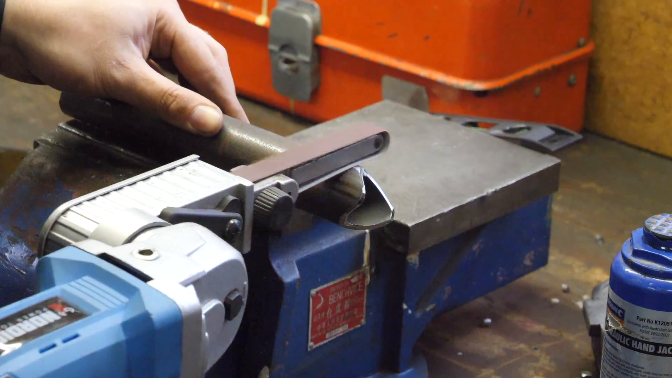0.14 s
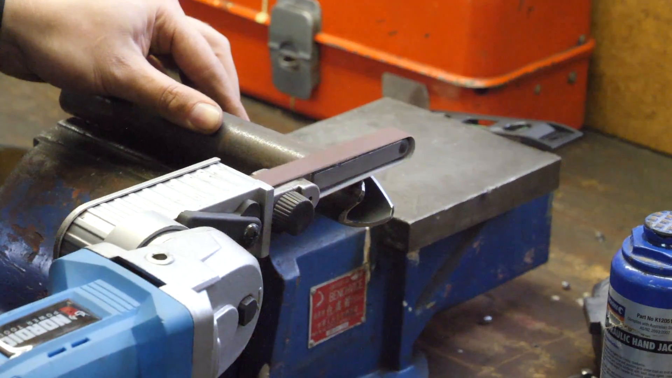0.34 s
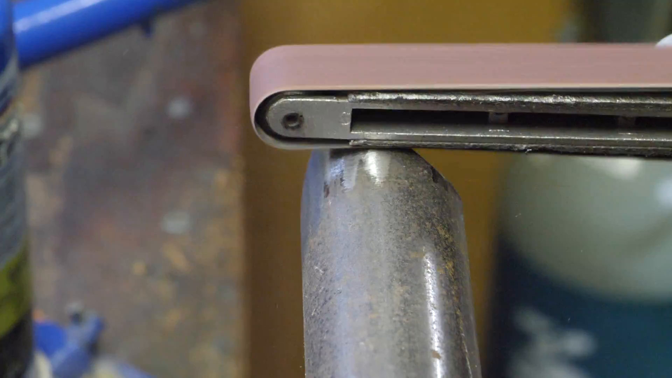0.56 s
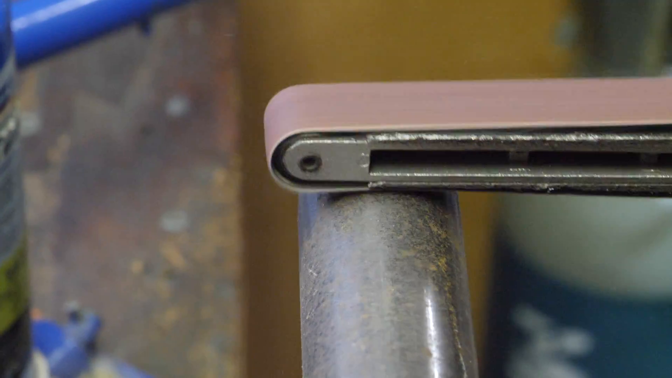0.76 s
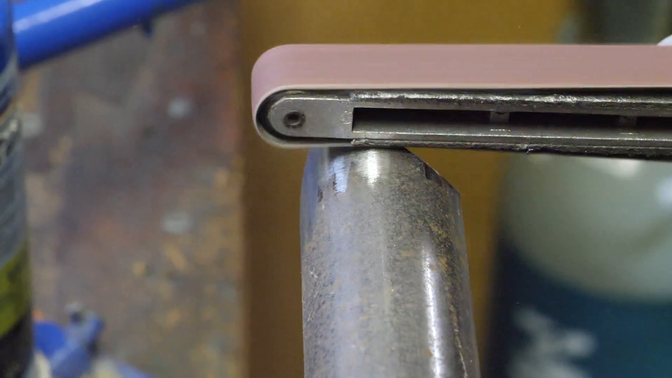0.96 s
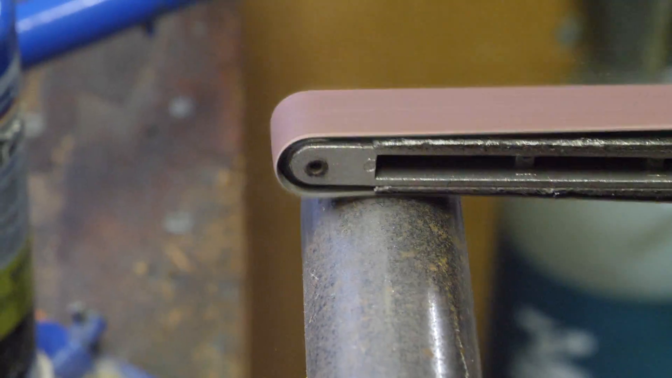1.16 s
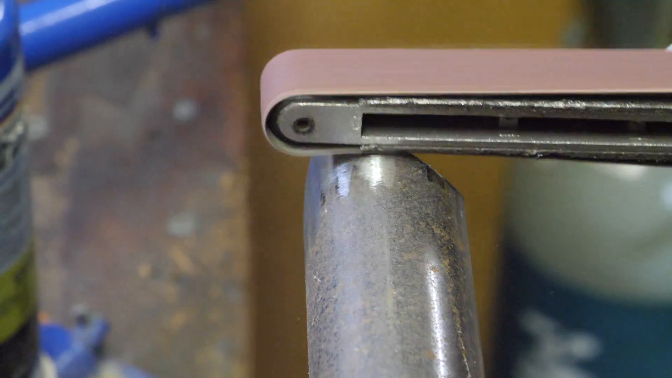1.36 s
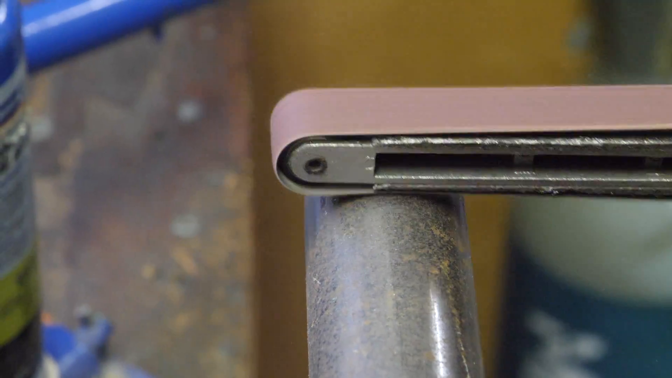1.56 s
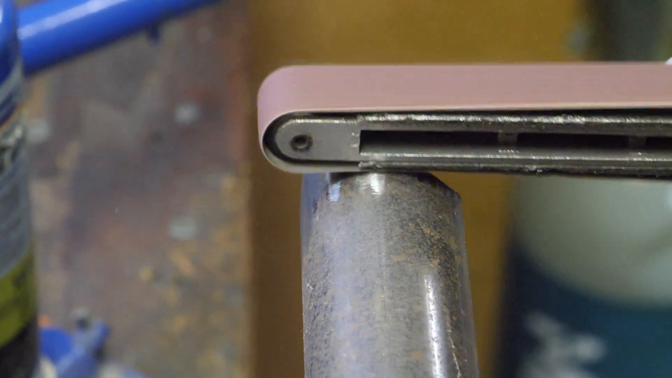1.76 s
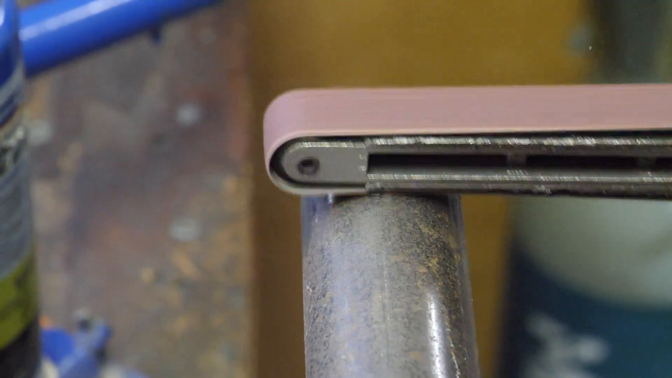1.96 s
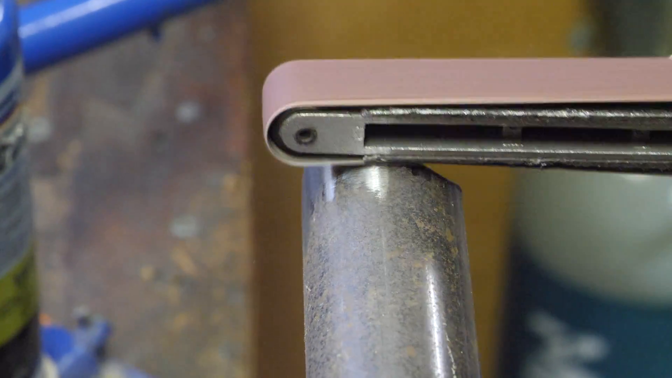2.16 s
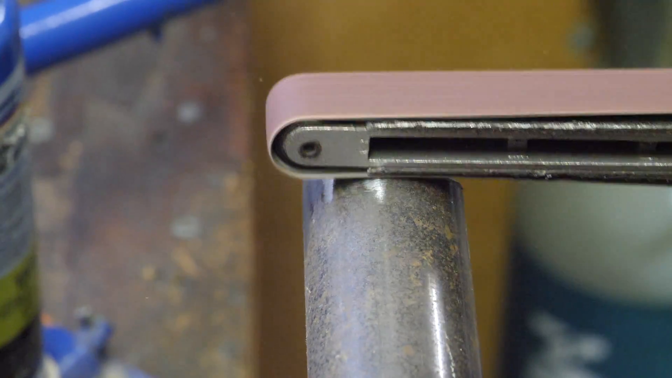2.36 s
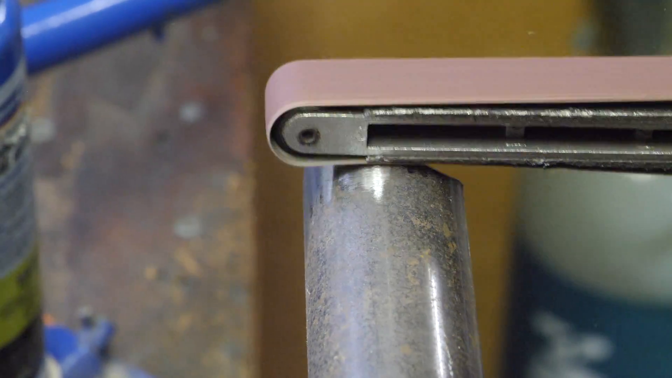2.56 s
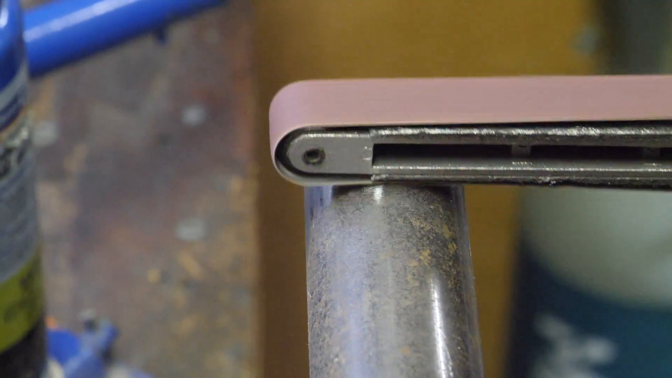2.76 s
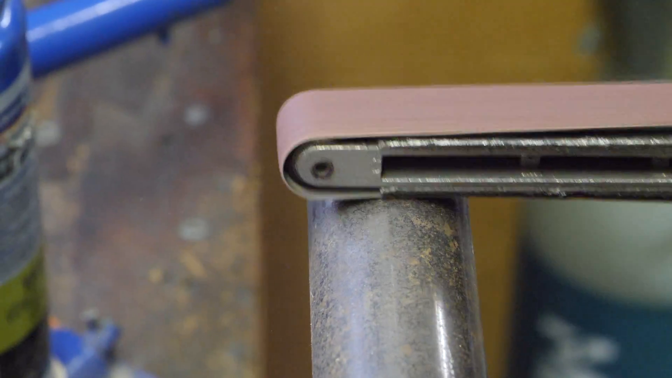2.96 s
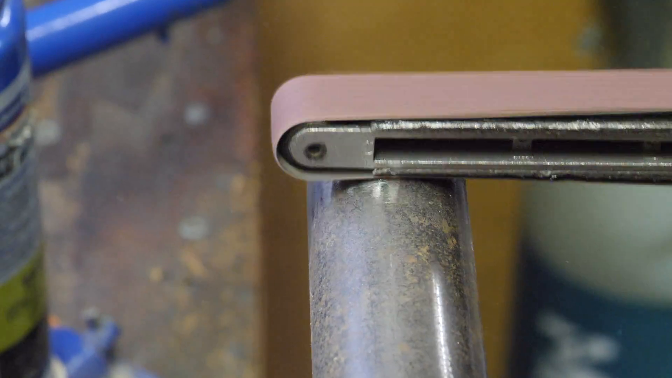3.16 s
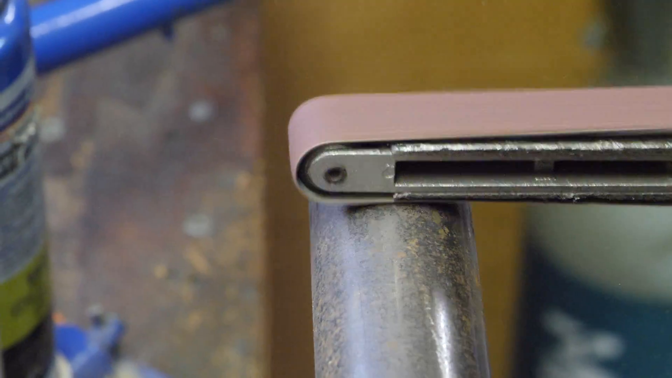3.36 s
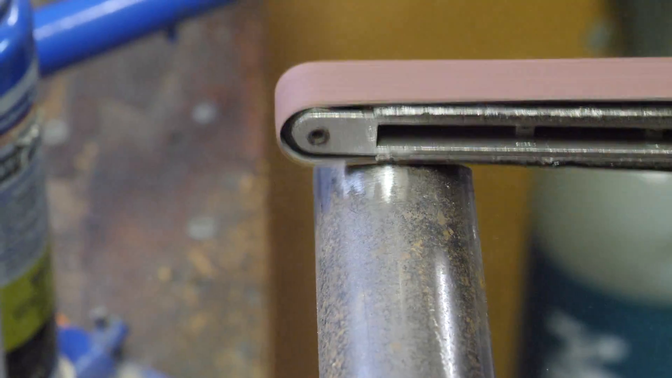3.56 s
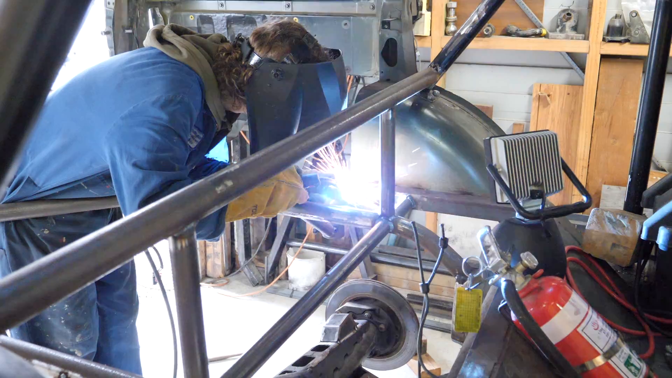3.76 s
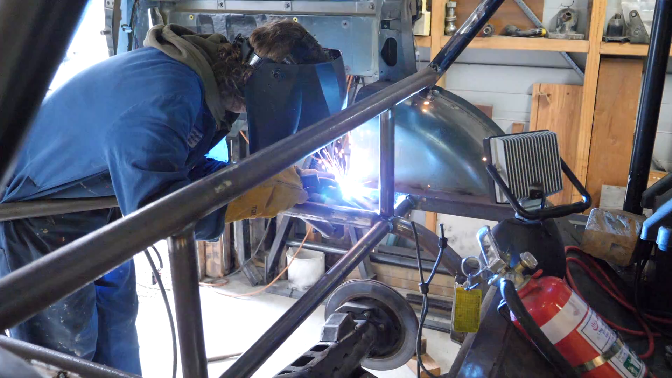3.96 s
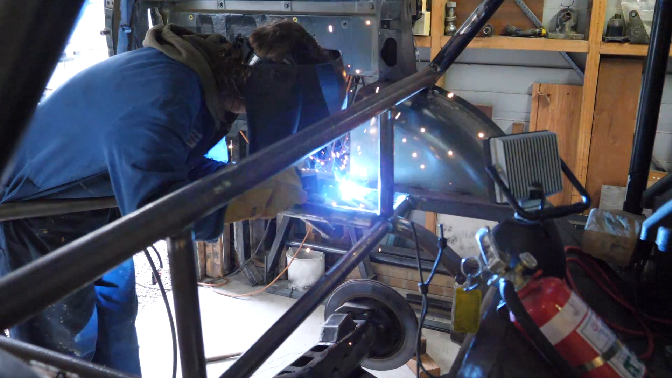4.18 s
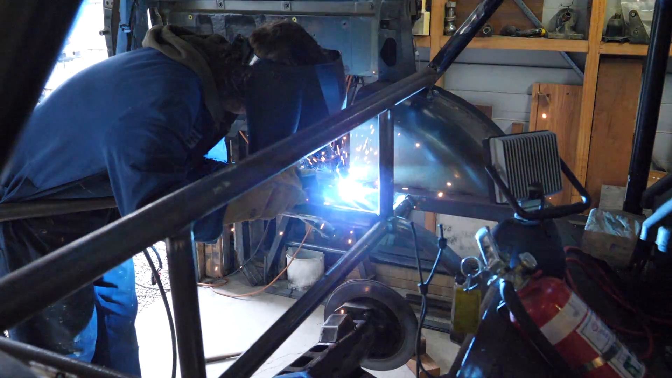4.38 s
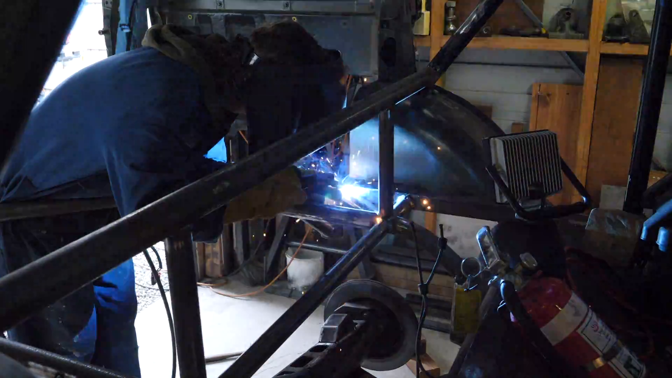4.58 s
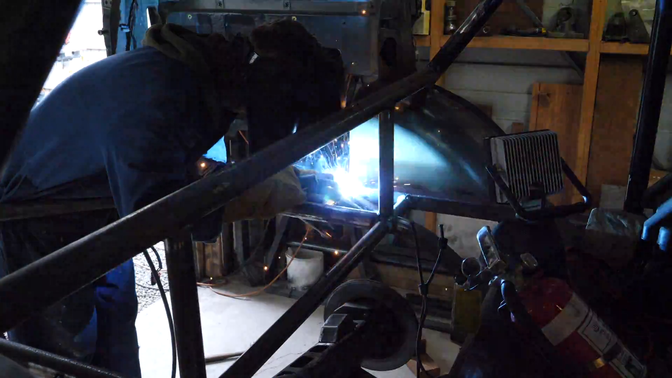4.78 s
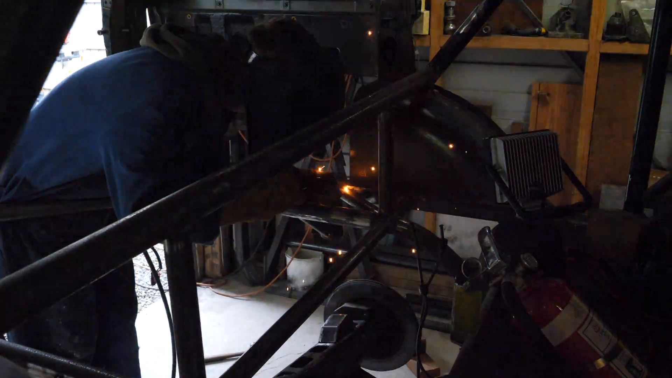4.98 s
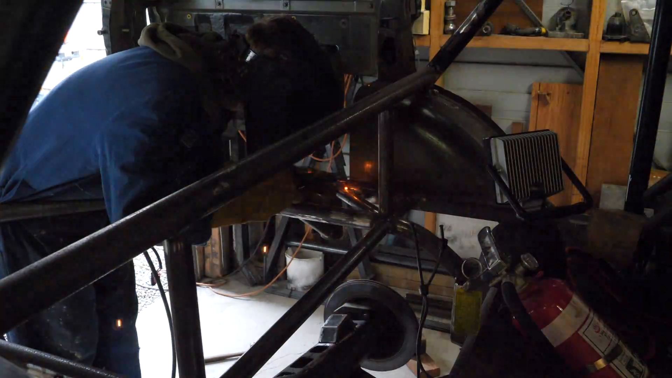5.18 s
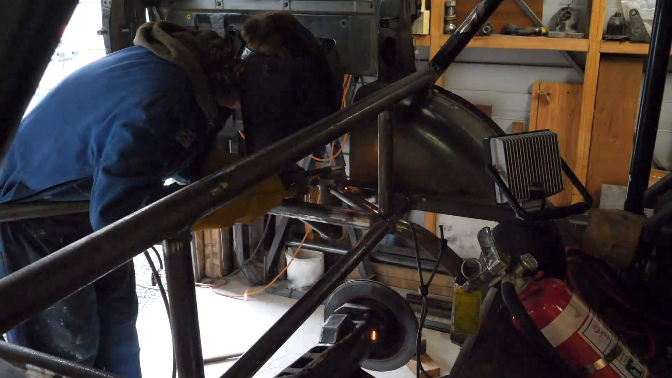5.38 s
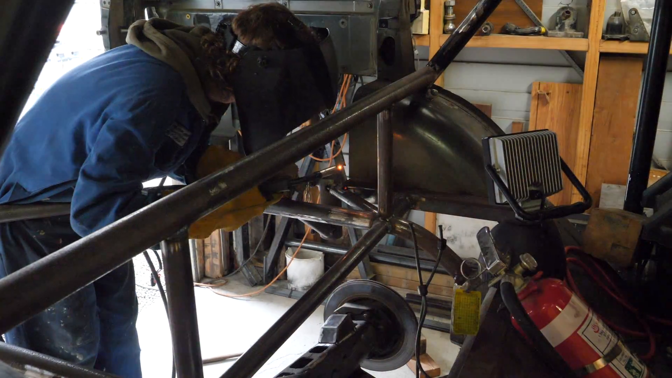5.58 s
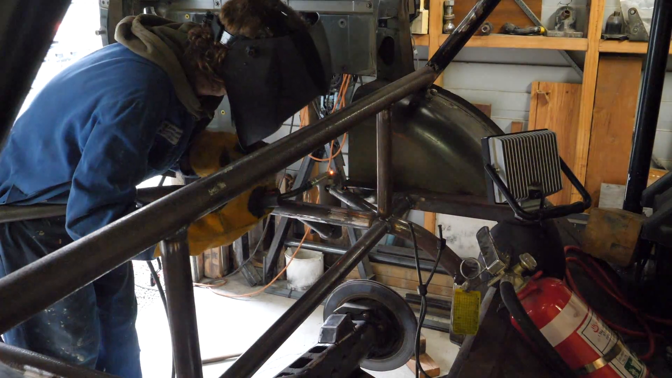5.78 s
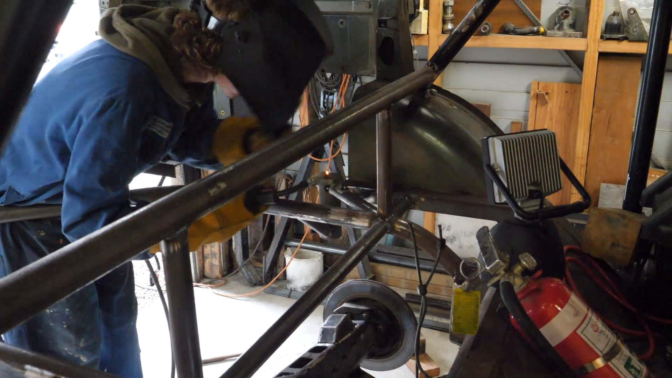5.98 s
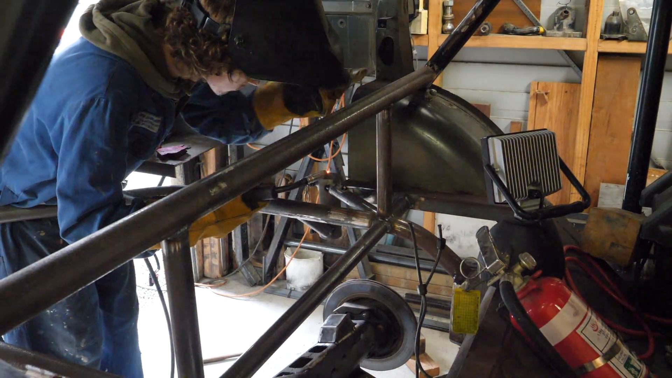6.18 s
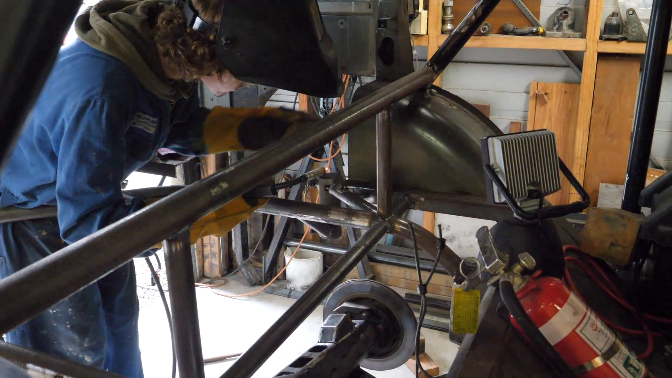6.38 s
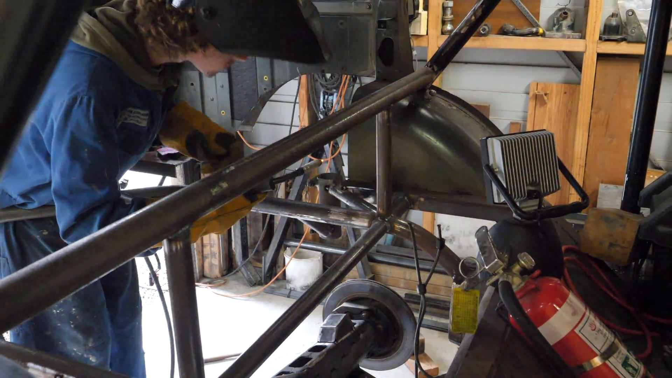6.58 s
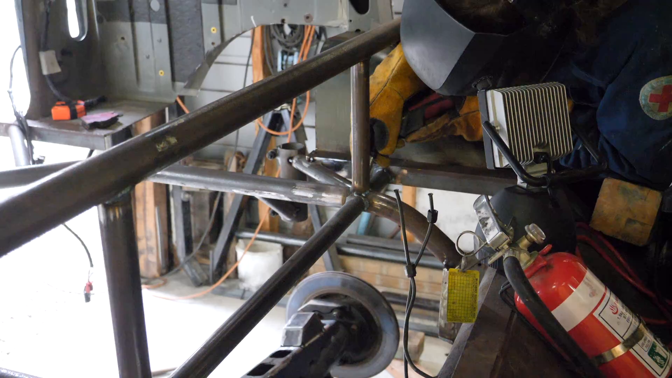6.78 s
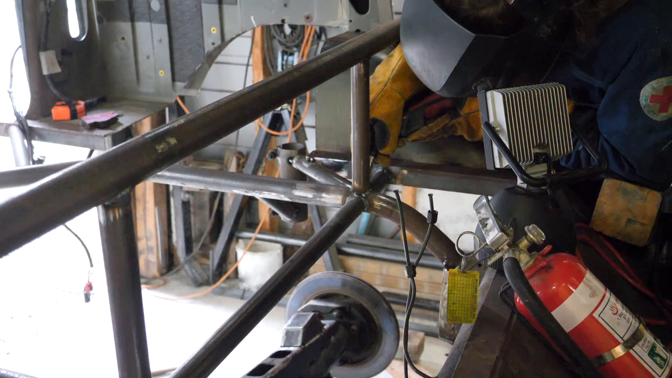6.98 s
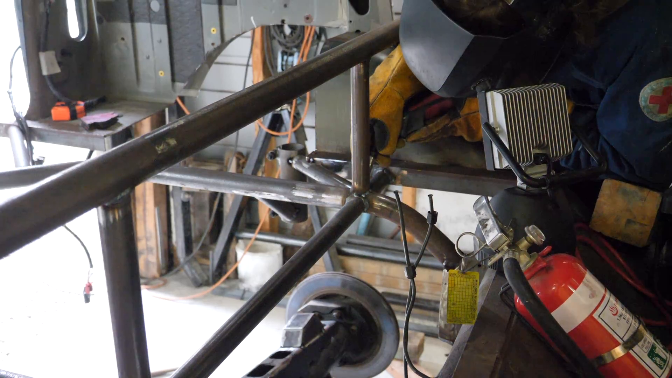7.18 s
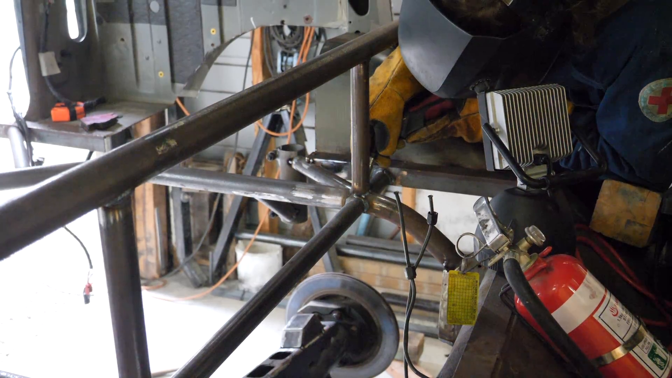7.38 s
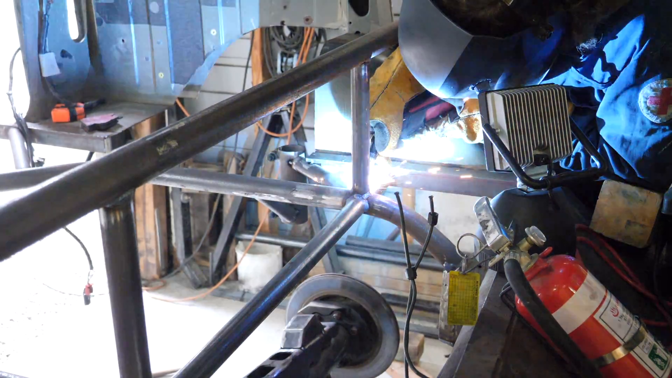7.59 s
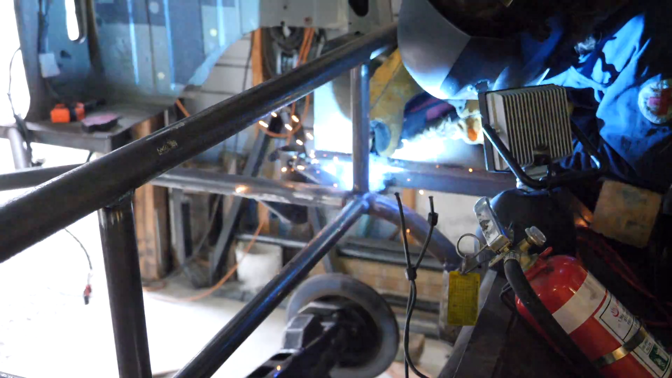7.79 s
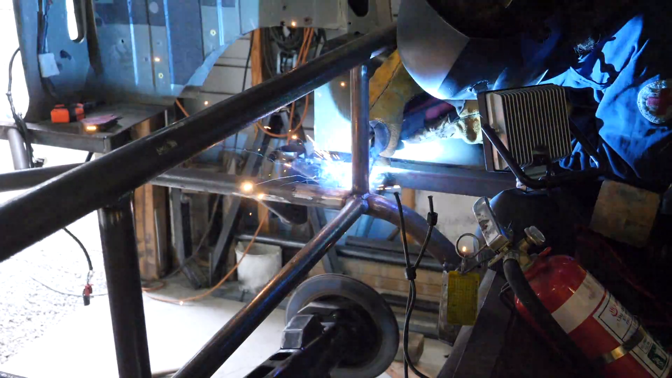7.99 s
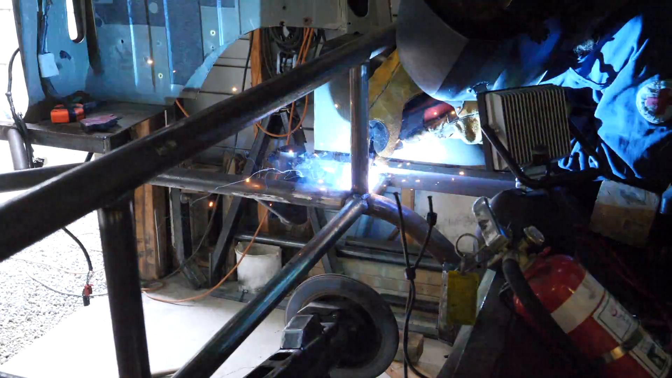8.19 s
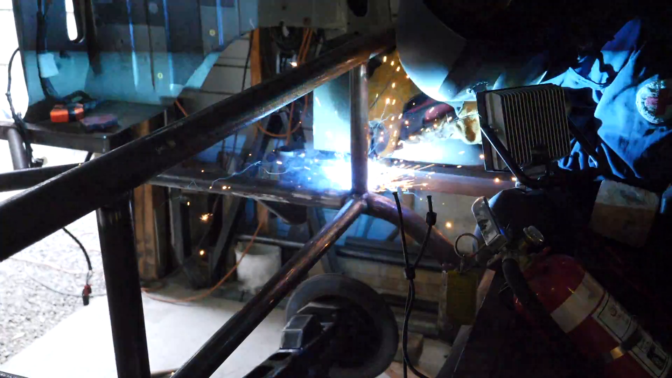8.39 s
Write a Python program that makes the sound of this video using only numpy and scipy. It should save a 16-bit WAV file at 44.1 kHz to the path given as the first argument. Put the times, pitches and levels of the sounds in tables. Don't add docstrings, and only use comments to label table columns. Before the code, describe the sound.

Close, bright power sanding opens: motor roar, high gear whine and quick strokes of abrasive rasp on steel. A hard cut leads to a far softer room drone, a puff of gas and rapid sharp welding snaps, heard a little way off inside a reverberant tube frame. Gas keeps hissing with a thin whistle, then torch knocks and near quiet, before another gas burst and a closer, irregular, slightly distorted crackle.

```python
import sys
import numpy as np
from scipy import signal
from scipy.fft import rfft, irfft, next_fast_len
from scipy.io import wavfile
from scipy.ndimage import uniform_filter1d, map_coordinates

SR = 44100
rng = np.random.default_rng(int(sys.argv[2]) if len(sys.argv) > 2 else 0)


def attenuation_scalar(level_db):
    decades = np.asarray(level_db, float) / 20
    return 10 ** decades


def unload_wav(signal):
    wavfile.write(
        sys.argv[1],
        SR,
        np.round(np.clip(np.atleast_2d(signal).T, -1, 1) * 32767).astype(np.int16),
    )


N = 372204
TIME = np.arange(N) / SR
CUTS = (.5, 3.7137)


def unit(x):
    return x / np.sqrt(np.mean(x ** 2) + 1e-20)


def along(points, hz):
    f, v = np.transpose(points)
    return np.interp(np.log(hz + 1), np.log(f + 1), v)


def curves(rows):
    s, *columns = np.transpose(rows)
    return [np.interp(TIME, s, column) for column in columns]


def wobble(rate):
    return map_coordinates(rng.standard_normal(int(N * rate / SR) + 4), [TIME * rate])


def filtered(x, response):
    m = next_fast_len(len(x) + 8192)
    return irfft(rfft(x, m) * response(np.fft.rfftfreq(m, 1 / SR)), m)[:len(x)]


def modes(table):
    def response(f):
        total = 0
        for k, (centre, width, db) in enumerate(table):
            resonance = 1j * f * width / (centre * centre - f * f + 1j * f * width)
            total = total + (-1) ** k * attenuation_scalar(db) * resonance
        return total
    return response


def dipped(x, dips):
    def response(f):
        gain = 1
        for hz, width, depth in dips:
            gain = gain * (1 - np.minimum(depth, 1) * modes([(hz, width, 0)])(f))
        return gain
    return filtered(x, response)


def rush(spectrum, grain_db=0, ripple_db=0):
    grains = rng.standard_normal(N) * attenuation_scalar(grain_db * np.minimum(rng.exponential(size=N), 4))
    ripple = rng.standard_normal(500)

    def response(hz):
        return attenuation_scalar(along(spectrum, hz) + ripple_db * np.interp(hz, np.arange(500) * 45., ripple))
    return unit(filtered(grains, response))


def tones(lines, speed, sway_db, blur, blur_hz):
    turns = np.cumsum(speed) / SR
    count = int(N / SR * 32) + 2

    def drift(slow=1):
        knots_s = np.arange(count) * slow / 32
        return np.interp(TIME[:len(speed)], knots_s, rng.standard_normal(count))

    heard = np.zeros(len(speed))
    for hz, db in lines:
        unsteady = np.sqrt(hz / blur_hz)
        level = np.sqrt(2) * attenuation_scalar(db + sway_db * unsteady * drift(slow=3.1))
        heard += level * np.sin(2 * np.pi * hz * turns + blur * unsteady * drift())
    return np.pad(heard, (0, N - len(speed)))


def belt_file():
    # time_s, turns_per_s
    motor_speed = [(0, 267.5), (.48, 267.5), (.6, 265.9), (1.1, 265.2), (2.1, 265.3), (2.6, 264.8),
                   (3.6, 265.7)]
    # centre_hz, width_hz, level_db
    arm_modes = [(751, 63, -3), (900, 104, 4), (960, 248, 0)]
    # pitch_hz, level_db (rms)
    wide_tones = [(267.6, -62.5), (683.7, -33), (877.5, -37), (2116, -42), (2681, -37), (3284, -42),
                  (3483, -25), (3747, -36), (4124, -39), (4883, -40)]
    # pitch_hz, level_db (rms)
    close_tones = [(265.2, -54), (678.3, -35.5), (872.1, -31.5), (1061, -39.5), (1357, -41), (1591, -41),
                   (1744, -40), (2299, -50.5), (2652, -33), (2917, -46), (3158, -34.5), (3182, -28.5),
                   (3340, -46), (3444, -35), (3713, -28.5), (4774, -40.5), (4915, -43), (5792, -51),
                   (7149, -41.5), (7946, -55)]
    shaft_hz = curves(motor_speed)[0]
    beat = 1 + 0.24 * np.sin(2 * np.pi * np.cumsum(shaft_hz) / SR)
    wide = np.clip((CUTS[0] - TIME) / .004, 0, 1)
    arm = attenuation_scalar(-28.5) * unit(filtered(rng.standard_normal(N), modes(arm_modes)))
    whine_wide = tones(wide_tones, shaft_hz[TIME < CUTS[0]] / wide_tones[0][0],
                       sway_db=1.5, blur=0.28, blur_hz=3000)
    whine_close = tones(close_tones, shaft_hz[TIME < CUTS[1]] / close_tones[0][0],
                        sway_db=2.0, blur=0.7, blur_hz=3000)
    noise = beat * (motor_roar(wide) + grit_rasp())
    whine = wide * whine_wide + (1 - wide) * (arm + whine_close)
    return (noise + whine) * np.clip((CUTS[1] - TIME) * 500, 0, 1)


def motor_roar(wide):
    # freq_hz, level_db_per_hz
    rumble = [(20, -35), (100, -33.5), (250, -31.5), (420, -32)]
    # freq_hz, level_db_per_hz
    roar_wide = [(280, -53), (480, -20), (633, -9.5), (671, -7.5), (754, -6.5), (1270, -9.5), (2090, -7),
                 (2330, -13), (2670, -3), (2960, -4), (3470, -0.5), (4320, -5.5), (5620, -5), (8440, -22),
                 (15600, -33)]
    # freq_hz, level_db_per_hz
    roar_seen_close = [(510, -11.5), (600, -19), (720, -14), (950, -7),
                       (1100, -6.5), (1270, -13), (1400, -8.5), (2050, -6), (2600, -2.5), (3300, -1), (3830, -4),
                  (4200, -5), (4550, -5), (4900, -3.5), (5900, -6), (6250, -10.5), (7100, -7), (7650, -16),
                       (9000, -16.5), (11000, -20), (13500, -27.5), (15700, -27)]
    far = attenuation_scalar(0.04) * rush(rumble + roar_wide[1:], grain_db=5.0, ripple_db=3.0)
    near = attenuation_scalar(-0.38) * rush(rumble + roar_seen_close, grain_db=3.0, ripple_db=1.5)
    return attenuation_scalar(-17.5 + 0.55 * wobble(8.19)) * (wide * far + (1 - wide) * near)


def grit_rasp():
    # freq_hz, level_db_per_hz
    grit = [(3000, -36), (6000, -4), (7500, -2), (8000, 5), (8500, -3.5), (10000, -4), (11000, -1.5),
            (14000, -4.5), (15700, -6)]
    return attenuation_scalar(pressure_db() - 1.5 + 1.2 * wobble(40)) * rush(grit, grain_db=2.5, ripple_db=2.5)


def pressure_db():
    # middle_s, rasp_db, hold_s
    presses = [(0.364, -20.5, .04), (0.644, -25.5, 0.072), (1.012, -23.5, .04), (1.4, -22.5, 0.032),
               (1.75, -24, .02), (2.16, -23, 0.079), (2.52, -22.5, .07), (2.9, -26, .04),
               (3.03, -27.5, 0.044), (3.28, -27.5, 0.0594), (3.69, -25.5, 0.073)]
    press_db_per_s, lift_db_per_s, resting_db = 117, 200.5, -30
    strokes = []
    for s, db, hold in presses:
        until_hold = np.clip(s - hold / 2 - TIME, 0, 9)
        since_hold = np.clip(TIME - s - hold / 2, 0, 9)
        strokes.append(db - press_db_per_s * until_hold - lift_db_per_s * since_hold)
    return np.maximum(np.max(strokes, axis=0), resting_db)


def arc(sparks, shock, snap, echoes, hall, snap_db, burst, echo_hz, echo_width_hz, early_db, late_db):
    treble_hz, shift = 6000, 0.42
    body_grows = 1.1
    t = np.arange(SR // 2) / SR
    ring = filtered(1. * (t == 0), lambda f: modes(snap)(f) + modes([shock])(f))
    direct = -ring / (1 + (t / burst) ** 6)

    paths = np.zeros(len(t))
    for k, (s, db) in enumerate(echoes):
        paths[round(s * SR)] = (-1) ** k * attenuation_scalar(db)
    bounced = signal.fftconvolve(paths, direct)[:len(t)]
    bounced = filtered(bounced, lambda f: modes([(echo_hz, echo_width_hz, 0)])(f) ** 2)

    diffuse = diffuse_field(t, hall, early_db)
    crack = attenuation_scalar(snap_db) / abs(direct).max()
    boom = attenuation_scalar(late_db) / diffuse[:, :1500].std()
    body = crack * bounced + boom * diffuse[0] * np.sqrt(1 - shift ** 2)
    treble = filtered(crack * direct + body, lambda f: (1j * f / (treble_hz + 1j * f)) ** 2)

    s, db, treble_db = np.transpose(sparks)
    turn = 2 * np.pi * rng.random(len(s))
    start = round(s.min() * SR)
    at = np.round(s * SR).astype(int) - start
    train = np.zeros((5, at.max() + 1))
    room = attenuation_scalar(body_grows * db)
    train[:, at] = [attenuation_scalar(db), room, attenuation_scalar(db) * (attenuation_scalar(treble_db) - 1),
                    shift * room * np.cos(turn), shift * room * np.sin(turn)]
    answers = [crack * direct, body, treble, *(boom * diffuse[1:])]
    heard = signal.fftconvolve(train, answers, axes=1).sum(0)
    return np.pad(heard, (start, N))[:N]


def diffuse_field(t, hall, early_db):
    # freq_hz, t60_s
    shop_decay = [(300, 0.13), (1000, 0.14), (3000, 0.19), (9000, 0.18), (15000, 0.064)]
    hz, frames, z = signal.stft(rng.standard_normal((3, len(t))), SR, nperseg=256)
    decay = attenuation_scalar(-60 * frames / along(shop_decay, hz)[:, None])
    late = signal.istft(z * decay, SR, nperseg=256)[1][:, :len(t)]
    early = rng.standard_normal(late.shape) * attenuation_scalar(-60 * t / 0.047)
    spectrum = rfft(attenuation_scalar(early_db) * early + late / late[:, :800].std())
    even = np.sqrt(uniform_filter1d(abs(spectrum) ** 2, size=60))
    colour = attenuation_scalar(along([(24, -70.0)] + hall[1:], np.fft.rfftfreq(len(t), 1 / SR)))
    build_s = .0012
    return irfft(spectrum / even * colour, len(t)) * (1 - np.exp(-t / build_s)) * (t < .45)


def first_weld():
    # start_s, level_db, treble_db
    touches = [(3.8071, -14.5, 8), (3.8093, -30, 1.5)]
    # start_s, level_db, treble_db
    stutter = [(3.8239, -3.5, 4.0), (3.8388, -11.0, 1.0), (3.8506, -9.5, 3.5), (3.8721, -8.5, 6.0),
               (3.8841, -5.5, 3.5), (3.8974, -3.0, 1.5), (3.9097, -1.5, 0.0), (3.9277, -3.5, 0.0),
               (3.9315, -11.5, 3.0)]
    # start_s, level_db, treble_db
    shorts = [(3.9824, 1.0, -1.0), (4.0013, -3.5, 0.5), (4.0137, -3.5, -2.0), (4.0303, -3.5, 1.0),
              (4.0498, 0.0, -0.5), (4.0575, -5.0, 2.5), (4.0656, -5.0, -1.0), (4.0762, 1.0, -1.5),
              (4.0941, 0.0, -1.5), (4.1118, 2.0, -3.5), (4.1343, 0.0, -1.5), (4.1514, 1.0, -2.5),
              (4.1799, 0.5, -2.5), (4.2043, 0.5, -2.5), (4.2357, 0.0, -1.0), (4.2652, -1.0, 1.0),
              (4.28, -3.0, 0.5), (4.2949, -1.5, -0.5), (4.3103, -3.0, 2.0), (4.3261, -2.5, 1.0),
              (4.3417, -1.0, 0.5), (4.3572, -5.5, 0.0), (4.3739, -5.5, 2.5), (4.3912, -4.0, 0.5),
              (4.4079, -4.0, 1.0), (4.424, -3.5, 0.5), (4.4304, 0.0, 0.0), (4.4418, -5.0, -0.5),
              (4.4549, -5.5, 1.0), (4.4726, -2.5, 0.5), (4.5015, -2.5, 1.5), (4.5219, -2.0, -1.0),
              (4.5414, -4.0, 2.0), (4.5474, -5.5, 2.5), (4.5642, -1.5, 0.0), (4.5712, -4.0, 1.5),
              (4.5796, -3.0, -1.0), (4.5892, -5.0, 0.5), (4.5976, -0.5, -1.5), (4.6066, -3.0, 0.5),
              (4.6239, -1.0, -0.5), (4.6443, -2.0, -2.0), (4.6643, 2.5, -4.0), (4.686, 2.5, -4.5),
              (4.705, 0.0, -1.5), (4.7244, -2.5, -0.5), (4.7346, -0.5, -0.5), (4.7478, -3.5, 1.0),
              (4.7993, 1.0, -3.0), (4.8185, -2.0, -2.0), (4.8352, -4.0, -1.0), (4.8529, -2.0, -1.0),
              (4.8727, -1.0, -2.0)]
    # centre_hz, width_hz, level_db
    plates = [(900, 1050, -3), (3300, 490, 1.5), (4410, 240, 3.5), (5170, 615, 0), (7930, 600, -4),
              (10900, 760, 3), (11800, 800, 2), (13400, 1400, -3.5)]
    # delay_s, level_db
    surfaces = [(.0006, -4.5), (.0012, -8), (.0021, -4), (.0036, -9), (.0045, -5), (.0063, -10),
                (.0078, -4.5), (0.0105, -14)]
    # freq_hz, level_db_per_hz
    hall = [(150, -52), (250, -27), (563, -3), (670, 0.5), (1010, -12), (1180, -5.5), (1820, -4),
            (2060, -7), (2490, -8), (3460, -1.5), (3770, -4.5), (5060, -4.5), (7030, -8), (11800, -7.5),
            (15600, -12.5)]
    shock = (9000, 9000, -15)
    return arc(touches + stutter + shorts, shock, plates, surfaces, hall, snap_db=4, burst=0.0021,
               echo_hz=4914, echo_width_hz=5900, early_db=8, late_db=-16.5)


def second_weld():
    # start_s, level_db, treble_db
    strikes = [(7.5469, -18, 2.5), (7.5536, -9, 3.5), (8.0471, -20, 6), (8.1025, -24, 1),
               (8.2513, -15.5, 0.5)]
    # start_s, level_db, treble_db
    settling = [(7.5562, -5.0, 1.5), (7.5601, -4.0, 2.5), (7.5672, -5.5, 2.5), (7.5789, -6.5, 0.0),
                (7.5882, 0.0, 0.5), (7.5971, -1.5, -2.0), (7.6073, 0.0, -5.5), (7.6159, -5.5, -8.0),
                (7.6257, -2.0, -4.5), (7.6419, -4.5, 3.0), (7.6582, -1.5, 1.5), (7.698, 3.0, -1.0),
                (7.7278, -2.0, 3.0), (7.7539, -1.5, 1.5), (7.7606, -2.5, -4.0), (7.7835, -2.0, 2.5),
                (7.791, -6.5, -3.0), (7.8055, -4.0, 2.0), (7.8168, -3.0, 1.5), (7.8753, -3.5, 1.5),
                (7.9031, -5.0, 2.0), (7.9194, -4.0, 3.0), (7.9361, 0.5, 0.0)]
    # start_s, level_db, treble_db
    shorts = [(7.9528, -3.5, 1.5), (7.9888, 2.5, -2.0), (8.0223, -2.0, 2.5), (8.0493, -3.0, 1.5),
              (8.0696, 2.0, -0.5), (8.1089, -2.0, 1.0), (8.1525, 0.0, -2.0), (8.169, -5.5, 1.0),
              (8.1836, -4.0, -1.5), (8.189, -6.0, 1.0), (8.1957, -5.0, -3.5), (8.2182, -2.5, 0.0),
              (8.2346, -1.0, 0.0), (8.264, -4.5, 3.0), (8.279, -2.5, -2.0), (8.2854, 0.0, -4.0),
              (8.3016, -2.5, -0.5), (8.3088, -3.5, -0.5), (8.3251, -0.5, -2.5), (8.3415, 0.5, -2.0),
              (8.3497, -2.0, -1.0), (8.3596, 0.5, 0.0), (8.3682, -1.0, -2.0), (8.4011, 0.5, -0.5),
              (8.4094, 0.5, -7.0), (8.4178, -5.5, 0.0), (8.4351, -6.5, 4.5)]
    # centre_hz, width_hz, level_db
    plates = [(1263, 900, -13), (3500, 600, -4), (4980, 350, 6), (6000, 600, -13.5), (7200, 900, -13),
              (9300, 600, -14), (11900, 1200, -13), (15000, 1200, -28)]
    # delay_s, level_db
    surfaces = [(.0008, -8), (.0036, -15), (.005, -3), (.0069, -11), (.0139, -15)]
    # freq_hz, level_db_per_hz
    hall = [(150, -51), (250, -17), (372, -23.5), (482, -4.5), (838, -16.5), (946, -2), (1090, -13.5),
            (1510, -9.5), (2490, -10.5), (3460, -6), (4110, -13.5), (4970, -2), (8500, -13), (11800, -12),
            (15600, -17)]
    shock = (4600, 5000, -15)
    return arc(strikes + settling + shorts, shock, plates, surfaces, hall, snap_db=5.5, burst=.0014,
               echo_hz=3400, echo_width_hz=2200, early_db=3.5, late_db=-16.5)


def sizzle():
    # start_s, end_s, level_db
    burns = [
        (3.807, 4.914, -26),
        (7.545, 8.442, -30),
    ]
    # freq_hz, level_db_per_hz
    fry = [(20, -70), (300, -20), (700, -3), (2500, -7.5), (5000, -3.5), (8000, -8.5), (12000, -1.5),
           (15600, -3)]
    t60_s = .2
    alight = np.zeros(N)
    for start, end, db in burns:
        alight += attenuation_scalar(db - 60 * np.clip(TIME - end, 0, 9) / t60_s) * (TIME > start)
    return alight * attenuation_scalar(1.6 * wobble(30)) * rush(fry, grain_db=1.5)


def gas():
    # time_s, level_db
    flows = [
        [(3.743, -49), (3.77, -48), (4.9, -52), (5.3, -52.5), (5.7, -54.5), (6.045, -52), (6.062, -62),
         (6.1, -68)],
        [(7.513, -48), (7.53, -51), (8.44, -51)],
    ]
    # freq_hz, level_db_per_hz
    nozzle = [(2350, -35), (4000, -12), (4610, -9), (5080, -5), (5560, -3.5), (7270, -15), (7960, -15.5),
              (8810, -16.5), (9540, -11.5), (10300, -22), (11300, -16.5), (12000, -25), (13700, -20.5),
              (15600, -32)]
    # time_s, delay_s
    torch = [(3.7, 0.00054), (5.0, 0.00021), (5.2, 0.00046), (5.35, 0.00098), (5.55, 0.0011), (5.7, 0.0012),
             (6.08, 0.0014), (7.5, 0.00035)]
    # start_s, level_db
    openings = [
        (3.743, -43.5),
        (7.513, -40),
    ]
    # freq_hz, level_db_per_hz
    valve = [(880, -17), (1500, 2.5), (1750, -18.5), (2450, 3), (2980, -12), (3410, -2), (3990, -14.5),
             (5570, -14), (8080, -17), (10400, -11), (11600, -15.5), (13000, -4.5), (15600, -18.5)]
    flow = np.zeros(N)
    for rows in flows:
        flow += attenuation_scalar(curves(rows)[0]) * (TIME > rows[0][0]) * (TIME < rows[-1][0])
    jet = rush(nozzle)
    lag = curves(torch)[0] * (1 + 0.15 * wobble(11))
    work_echo = 0.4 * map_coordinates(jet, [(TIME - lag) * SR])
    hiss = unit(jet + work_echo) * attenuation_scalar(1.4 * wobble(8.7))
    surge = sum(attenuation_scalar(db - 60 * np.abs(TIME - s) / 1.1) * (TIME > s) for s, db in openings)
    return flow * hiss + surge * rush(valve)


def whistle():
    # time_s, pitch_hz, level_db
    glide = [(4.95, 5500, -58), (5.17, 5850, -54.5), (5.3, 5100, -55), (5.33, 5600, -56.5),
             (5.55, 5300, -55.5), (5.66, 5600, -55.5), (5.8, 5400, -58), (5.9, 5200, -57),
             (6.05, 5250, -55.5)]
    pitch_hz, level_db = curves(glide)
    flutter = filtered(rng.standard_normal(N), lambda f: 1 / (1 + (f / 250) ** 4))
    band = unit(flutter * np.sin(2 * np.pi * np.cumsum(pitch_hz) / SR))
    return attenuation_scalar(level_db) * (TIME > glide[0][0]) * (TIME < glide[-1][0]) * band


def handling():
    # start_s, level_db, centre_hz, width_hz,
    # t60_s
    knocks = [(5.95, -40, 1480, 300, .035), (5.952, -43, 943, 300, .06), (5.951, -48, 2500, 2000, .06),
              (6.03, -44, 700, 300, .15), (5.968, -41, 776, 450, .12), (6.08, -72, 10900, 9000, .7),
              (6.28, -76, 12000, 6000, .08), (7.5135, -42, 2580, 1200, .04), (6.258, -53, 900, 403, 0.063),
              (6.695, -71, 10980, 8000, 0.0074), (7.061, -53, 800, 300, 0.044),
              (7.22, -46, 700, 299, 0.054), (7.269, -48.5, 800, 299, .05), (7.42, -48, 3000, 1520, 0.4),
              (7.425, -54.5, 5300, 1480, 0.31), (7.462, -76.5, 11000, 6000, .01)]
    out = np.zeros(N)
    t = np.arange(SR // 4) / SR
    for s, db, centre_hz, width_hz, t60 in knocks:
        body = modes([(centre_hz, width_hz, 0)])
        knock = filtered(rng.standard_normal(len(t)) * attenuation_scalar(-60 * t / t60), lambda f: body(f) ** 2)
        out[round(s * SR):][:len(t)] += attenuation_scalar(db) * knock / knock[:400].std()
    return out


def shop():
    # freq_hz, level_db_per_hz
    room = [(12, -44.5), (20, -24), (146, -28), (170, -13), (218, -9.5), (297, -11.5), (346, -6),
            (471, -12), (707, -13.5), (763, -11.5), (840, -11), (1020, -16.5), (2000, -21.5), (2600, -53),
            (4400, -120)]
    # freq_hz, level_db_per_hz
    air = [(880, -40.5), (1500, -1.5), (1690, -2.5), (1860, -11.5), (2240, -6.5), (2620, -5.5), (3090, -10),
           (3550, -9.5), (4150, -17), (5200, -15), (15600, -52.5)]
    # pitch_hz, level_db (rms)
    fan = [(231.5, -60.5), (344.5, -60), (559.9, -58), (705.2, -55), (812.9, -64.5), (872.1, -59),
           (1077, -58.5)]
    drone = attenuation_scalar(-45.5 + 0.99 * wobble(21)) * rush(room)
    hum = tones(fan, np.ones(N), sway_db=0.5, blur=1.53, blur_hz=603)
    return (drone + attenuation_scalar(-53.0) * rush(air) + hum + handling()) * (TIME >= CUTS[1])


def scene():
    # centre_hz, width_hz, depth
    bench = [(4500, 200, 0.32)]
    # centre_hz, width_hz, depth (below 0 reinforces)
    bands_far = [(2030, 230, .75), (3766, 300, 0.6), (5130, 220, -0.5), (4400, 200, -0.2), (4720, 250, .45),
                 (11300, 500, .3), (12650, 400, .35), (15700, 600, .35), (5900, 300, .35), (650, 250, .3),
                 (280, 80, .4), (11600, 1500, -.15)]
    # centre_hz, width_hz, depth (below 0 reinforces)
    bands_near = [(3980, 990, 0.46), (5500, 230, 0.89), (5800, 150, 0.23), (570, 150, 0.28),
                  (8400, 600, 0.88), (3350, 370, -0.67), (4490, 95, 0.76), (8400, 58, -1.97),
                  (6840, 700, 0.56), (13300, 900, 0.49)]
    fry = sizzle()
    filing = dipped(belt_file(), bench)
    first = dipped(first_weld() + fry * (TIME < 6), bands_far)
    second = dipped(second_weld() + fry * (TIME > 6), bands_near)
    return (filing + first + second + gas() + whistle() + shop())[None]


def band_limit(x):
    return signal.sosfilt(signal.butter(12, 15800, fs=SR, output="sos"), x)


def record(dry):
    bass_cut_hz, top_hz = 80, 15840
    clipped = dry / (1 + np.abs(dry / 1.18) ** 8) ** (1 / 8)
    heard = filtered(clipped[0], lambda hz: 1j * hz / (bass_cut_hz + 1j * hz) * (hz < top_hz))[None]
    return band_limit(heard)


dry = scene()
out = record(dry)
unload_wav(out)
```